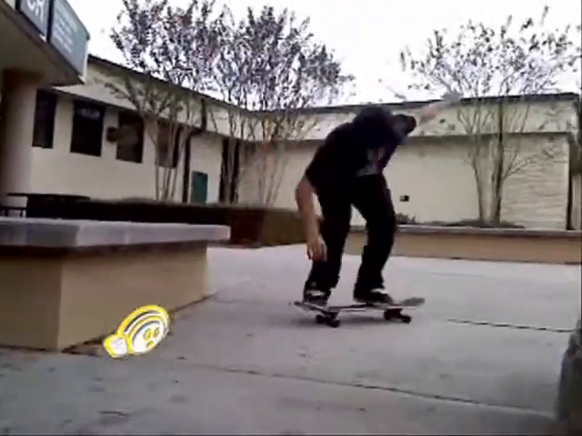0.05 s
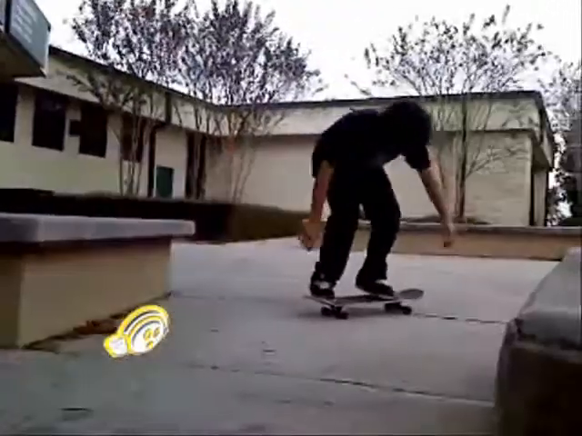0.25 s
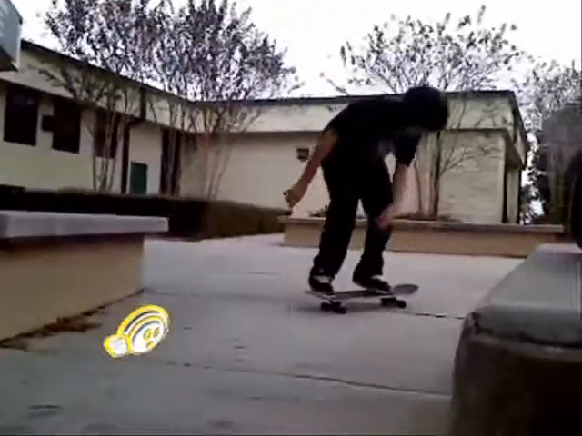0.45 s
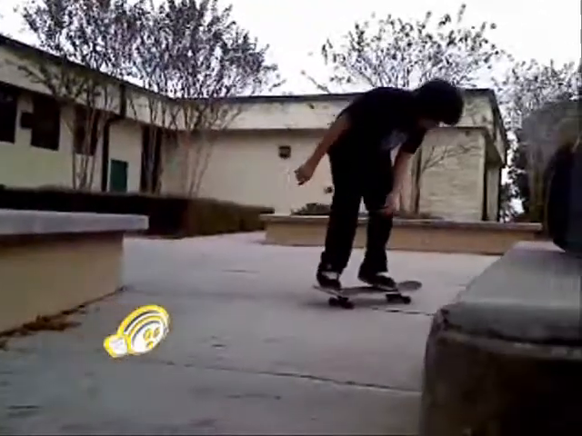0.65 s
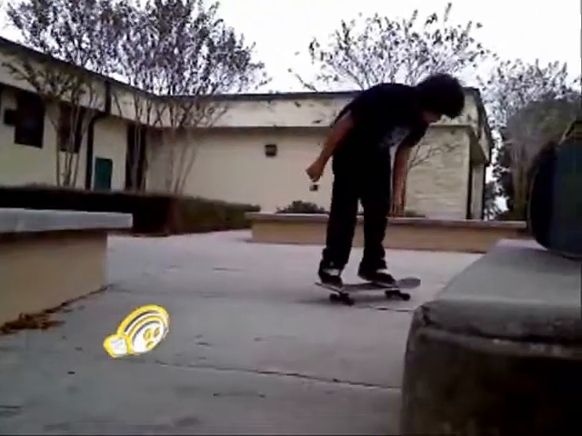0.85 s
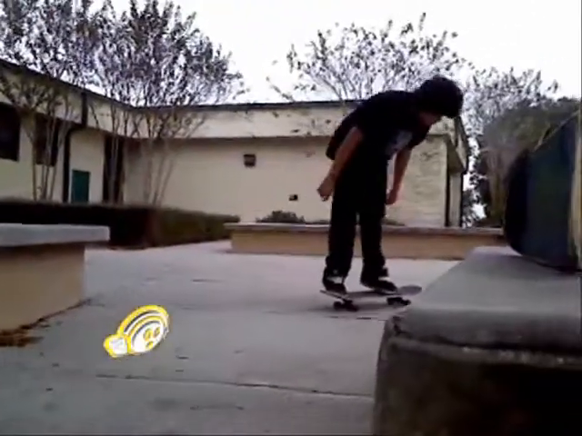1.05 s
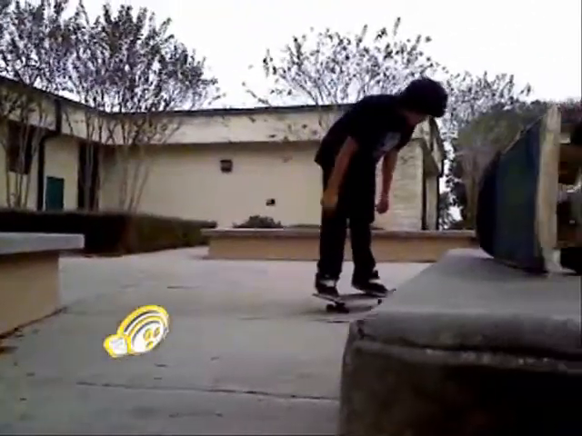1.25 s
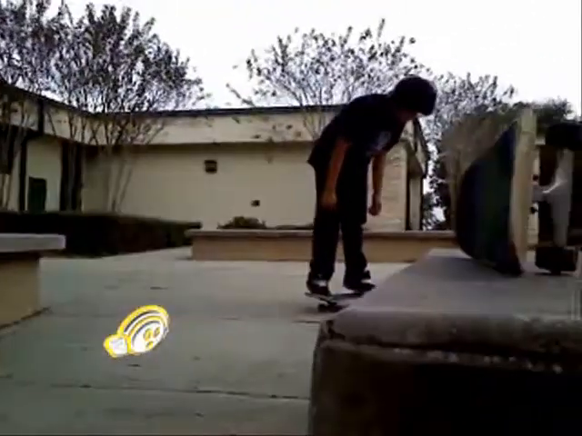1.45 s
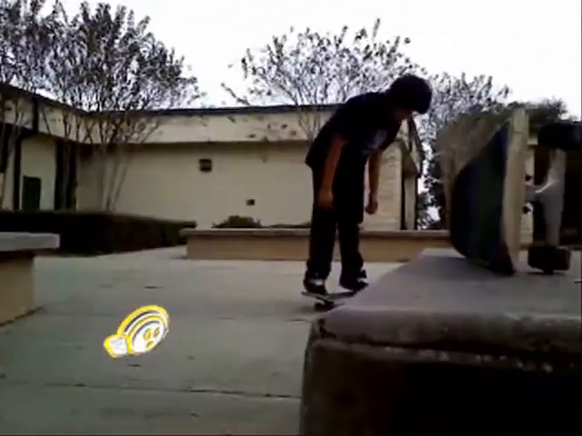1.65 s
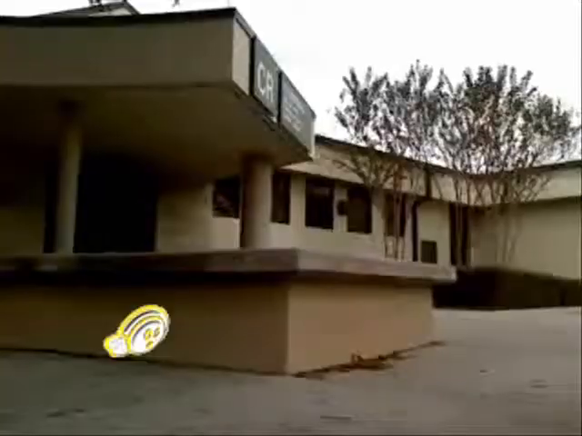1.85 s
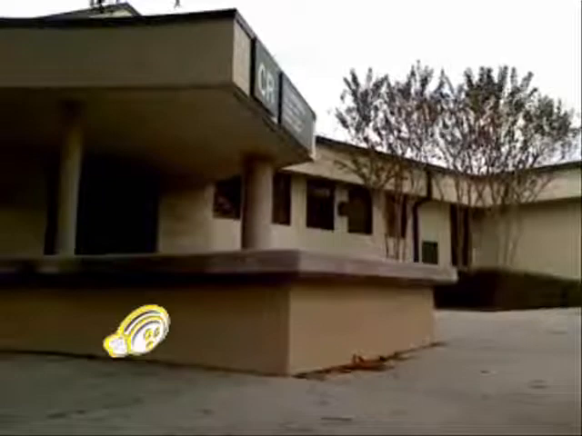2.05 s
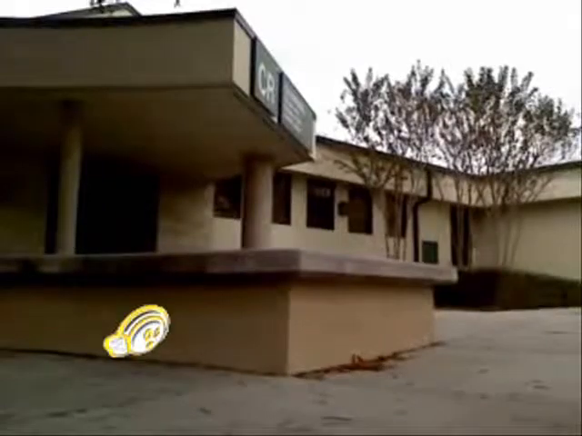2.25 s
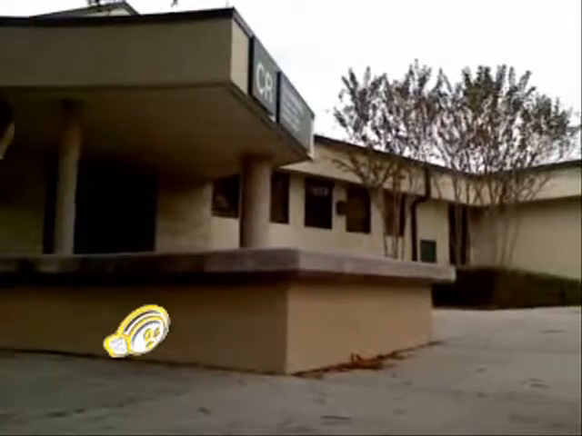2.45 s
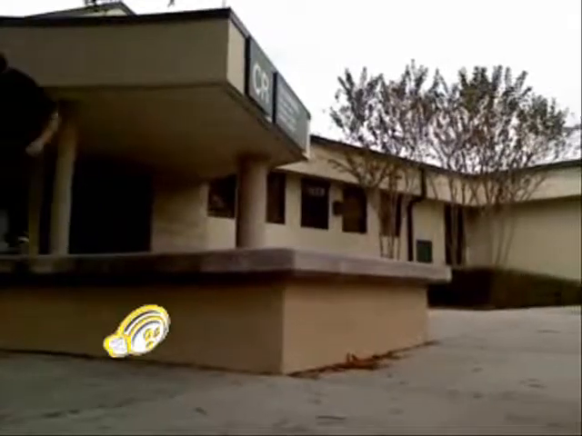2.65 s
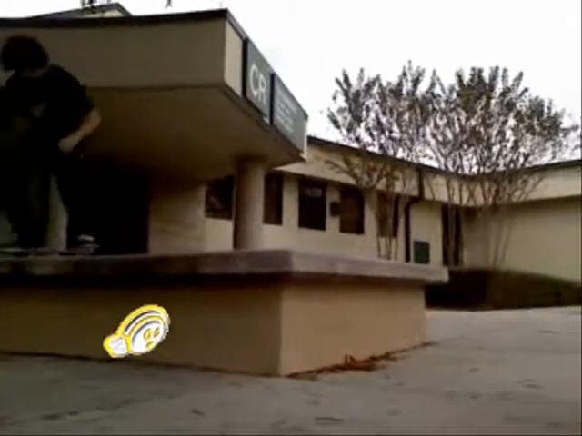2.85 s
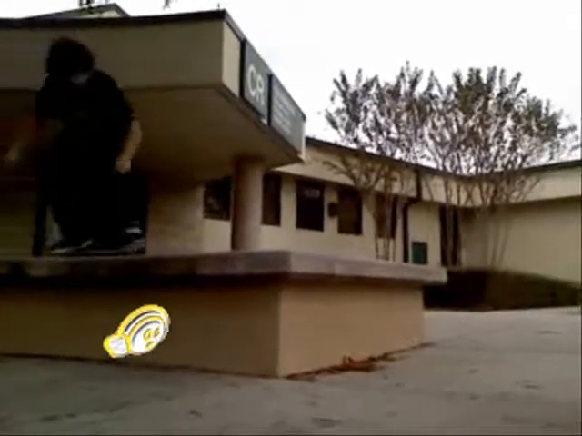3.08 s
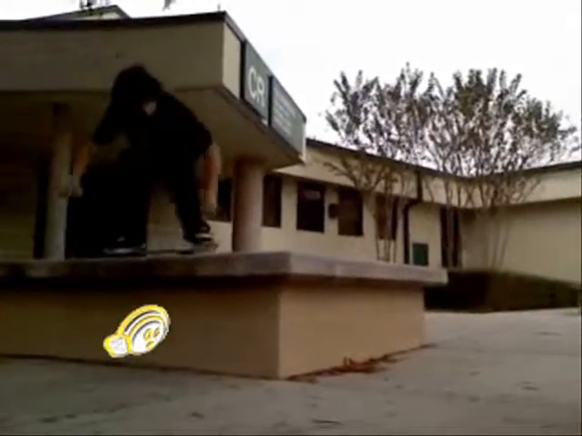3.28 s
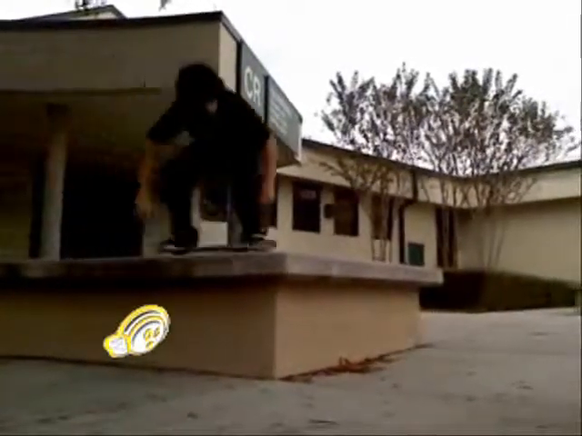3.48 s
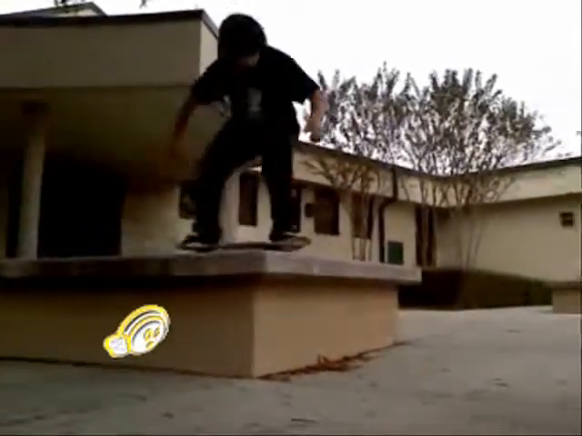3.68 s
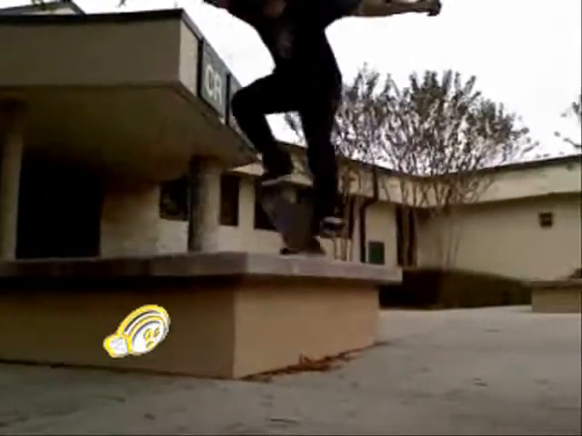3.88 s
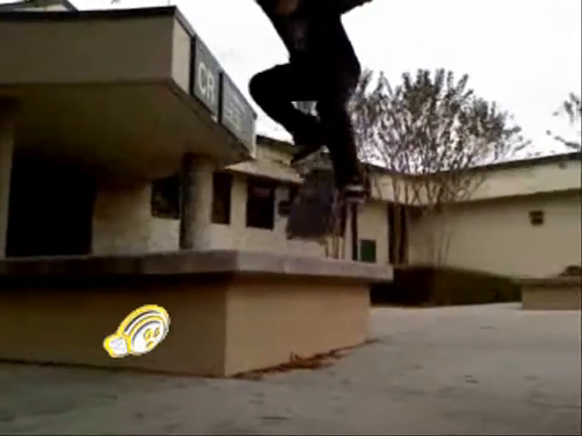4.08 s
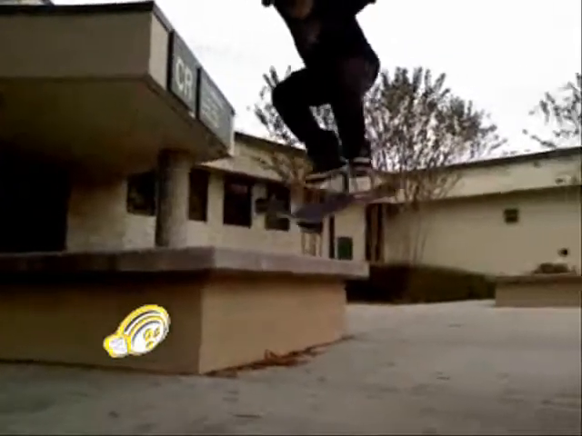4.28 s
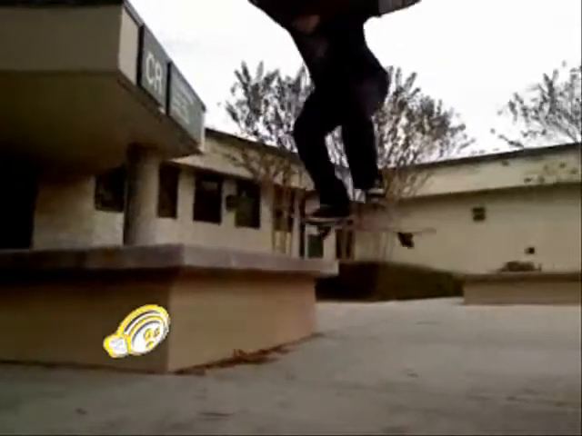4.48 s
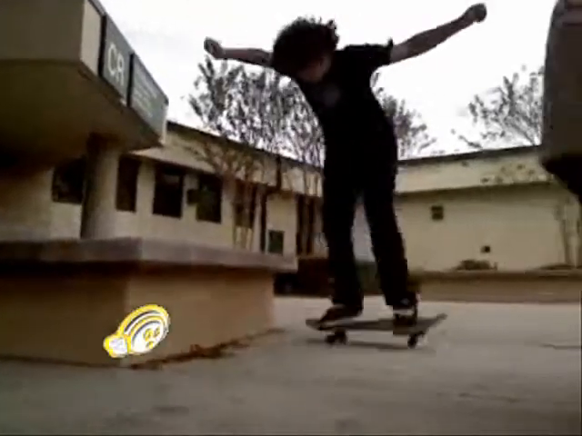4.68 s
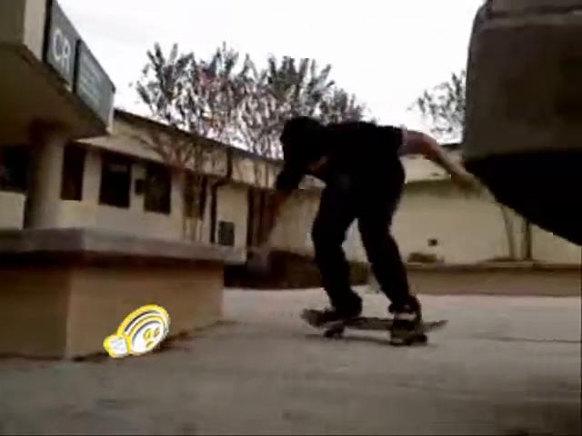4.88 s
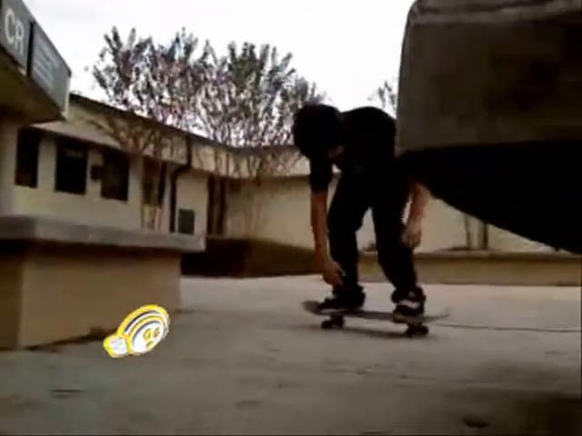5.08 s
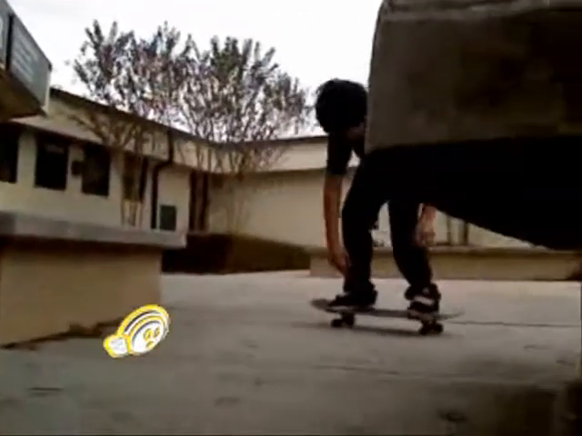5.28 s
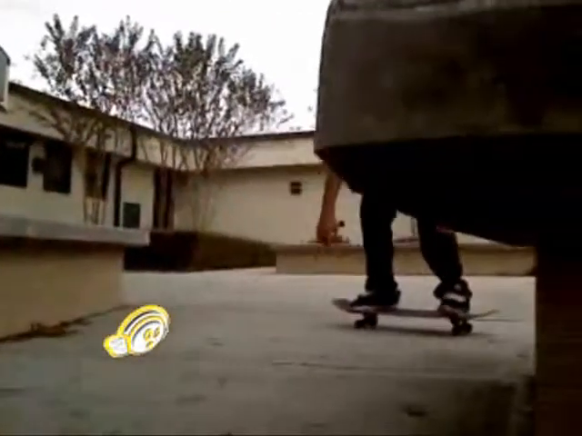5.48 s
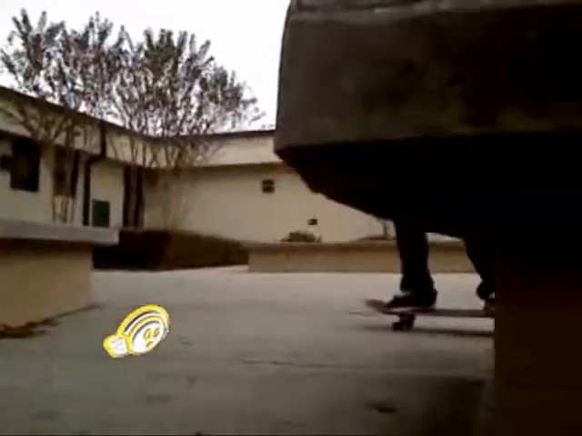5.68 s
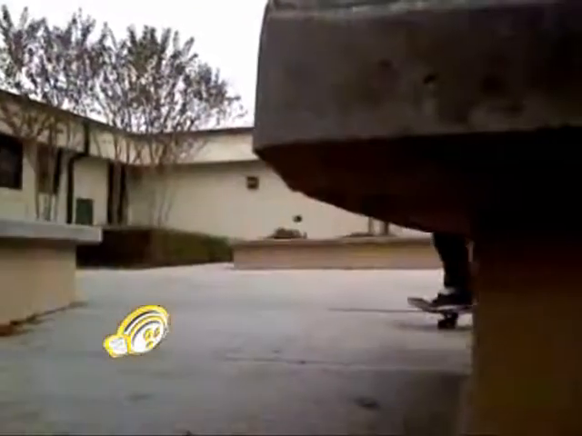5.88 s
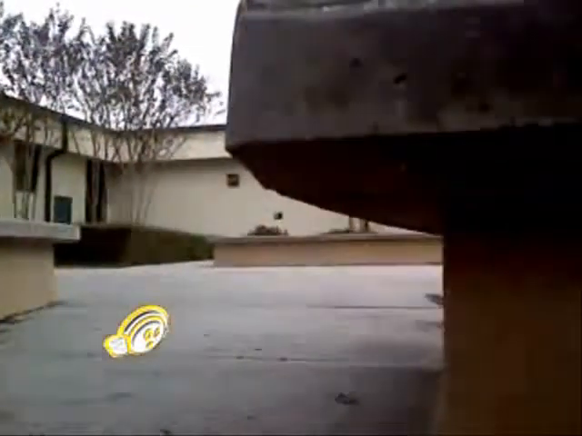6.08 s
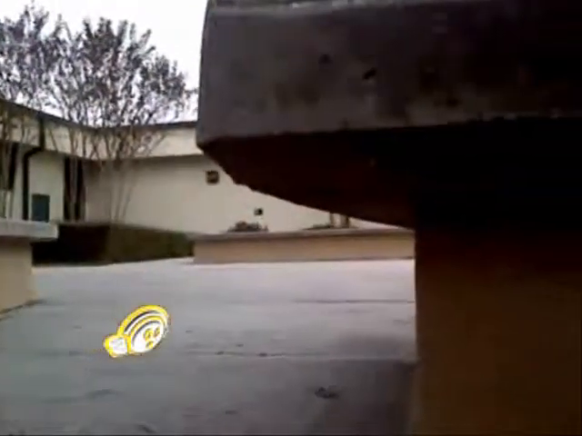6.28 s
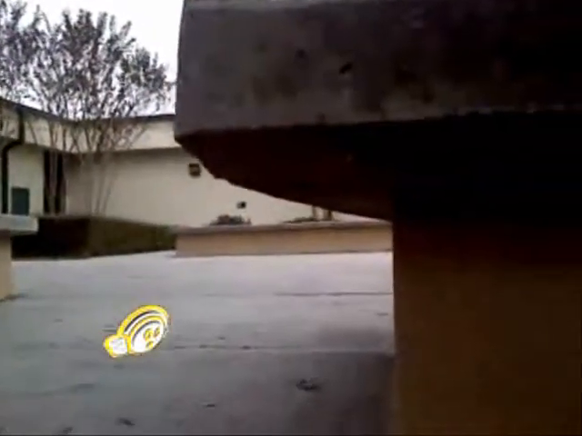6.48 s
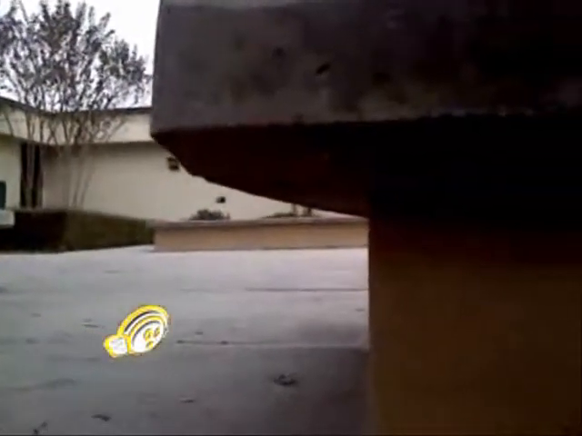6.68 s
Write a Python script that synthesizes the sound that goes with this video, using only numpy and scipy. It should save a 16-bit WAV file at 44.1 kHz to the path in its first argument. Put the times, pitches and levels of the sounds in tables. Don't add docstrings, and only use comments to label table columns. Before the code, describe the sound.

From the very start a skateboard slams onto concrete: a dense burst of wooden slaps and metal truck clanks until about 0.15 s, with short echoes off courtyard walls. Gritty wheels roll on, clacking at joints around 0.3-1.0 s and growing fainter, with a dry casing click near 1.25 and a snap at 1.55. A quick bright shoe scuff rasps at 1.9-2.05. A softer wooden landing rattles at 2.3, then wheels grind and clack from 2.7 to 3.7, with a loud close click at 3.1. From 3.9 to 4.7 sound slows to half speed; a dulled, stretched pop cracks at 4.2 and crumbles away. The hardest landing hits at 4.9, several slams with rattling hardware, settling by 5.2. Rolling recedes with small clacks at 5.7-6.0, a camera tick at 6.2 and a faint knock at 6.35. The sound is narrow, boxy and lo-fi throughout.

```python
import sys
import numpy as np
from scipy import signal
from scipy.io import wavfile
from scipy.ndimage import uniform_filter1d, map_coordinates

SR = 44100
rng = np.random.default_rng(int(sys.argv[2]) if len(sys.argv) > 2 else 0)


def materialize(psi):
    bounded = np.clip(np.atleast_2d(psi).T, -1, 1)
    quanta = np.round(bounded * 32767).astype(np.int16)
    wavfile.write(sys.argv[1], SR, quanta)


def gain_from_decibels(decibels):
    exponent = np.asarray(decibels, float) / 20
    return 10 ** exponent


N = 297234


def evened(x):
    return x / np.sqrt(np.mean(x ** 2) + 1e-20)


def read(points, hz):
    f, value = np.transpose(points)
    return np.interp(np.log(hz + 1), np.log(f + 1), value)


# (start [s], end [s])
SLOW_S = (3.898, 4.692)


def live(s):
    return s - (np.clip(s, *SLOW_S) - SLOW_S[0]) / 2


def curve(rows):
    s, *columns = np.transpose(rows)
    now_s = np.arange(N) / SR
    return np.array([np.interp(now_s, live(s), c) for c in columns])


def colour(x, points):
    hz, db = np.transpose(points)
    gains = [*gain_from_decibels(db), 0 * db[0]]
    taps = signal.firwin2(1023, [*hz, SR / 2], gains, fs=SR, window=("kaiser", 7))
    return signal.oaconvolve(x, taps, "same")


def patchy(spectrum, patchy_db):
    frames, hz = N // 256 + 5, np.fft.rfftfreq(1024, 1 / SR)
    a, b, patches = rng.standard_normal((frames, 513, 3)).T
    patches = uniform_filter1d(patches, size=6, axis=0)
    patches = evened(uniform_filter1d(patches, size=5, axis=1))
    level_db = read(spectrum, hz)[:, None] + patchy_db * np.clip(patches, -3.0, 1.6)
    z = (a + 1j * b) * gain_from_decibels(level_db)
    return evened(signal.istft(z, nperseg=1024, noverlap=768)[1][:N])


def ring(x, modes):
    out = np.zeros(x.shape)
    for k, (hz, width_hz, db) in enumerate(modes):
        r = np.exp(-np.pi * width_hz / SR)
        poles = [1, -2 * r * np.cos(2 * np.pi * hz / SR), r * r]
        out += (-1) ** k * gain_from_decibels(db) * signal.lfilter([1 - r, 0, r - 1], poles, x)
    return out


# (frequency [Hz], width [Hz], level [dB])
TRUCK_MODES = [(2080, 144, -1.75), (2254, 105, 0.4), (2484, 270, -1.7)]
AXLE_MODES = [(2740, 400, -13), (3294, 165, 0), (3410, 69, 2.5), (3706, 450, -2)]
DECK_MODES = [(59, 88, -14), (204, 65, -8), (265, 66, -3), (362, 116, -0.5), (533.4, 72, -3.5)]
PLANK_MODES = [(640, 200, -1.5), (910, 116, 1), (950, 62, 3), (1163, 105, -3)]
NOSE_MODES = [(1274, 86, -1), (1475, 144, -1.25), (1610, 79, 0.3), (1790, 153, 0.45)]


def shake_board(forces):
    board = (TRUCK_MODES, AXLE_MODES, DECK_MODES, PLANK_MODES, NOSE_MODES)
    return [ring(force, modes) for force, modes in zip(forces, board)]


# (struck [dB], rolling [dB], share of wood [dB/dB], share of steel [dB/dB])
PARTS = [
    (0, 0, 0.028, -0.067),
    (-3, 1, 0.21, 1),
    (-17, -12, 0.87, -0.24),
    (-6.5, -6, 0.71, -0.44),
    (-5.5, -1, 0.58, -0.88),
]


def parts_db(column, level_db, wood_db, steel_db):
    return np.array([level_db + p[column] + p[2] * wood_db + p[3] * steel_db for p in PARTS])


# (frequency [Hz], density [dB per Hz])
AIR = [(12, -53), (20, -9.5), (135, -16), (280, -1), (408, -23), (906, -5), (1970, -8), (2250, 3.5),
       (2810, -9.5), (3430, -4.5), (4000, -4), (5200, -55.5), (8800, -120)]


def air():
    return gain_from_decibels(-57) * patchy(AIR, patchy_db=5.0)


# (frequency [Hz], t60 [s])
YARD = [(150, 0.65), (500, 0.18), (1200, 0.28), (2500, 0.53), (4000, 0.42)]


def yard(x):
    taps = np.zeros(SR)
    at = np.arange(300, SR - 20, 20)
    taps[at + rng.integers(0, 20, len(at))] = rng.choice([-1., 1.], len(at))
    hz, t, z = signal.stft(taps, SR, nperseg=256)
    decay = gain_from_decibels(-60 * t / read(YARD, hz)[:, None])
    tail = signal.istft(z * decay, SR, nperseg=256)[1]
    return signal.fftconvolve(x, tail / np.linalg.norm(tail))[:N]


# (time [s], peak [dB], pitch [Hz], t60 [s], diaphragm push [dB])
TICKS = [
    (1.2443, -16.5, 2700, 0.01, -39),
    (1.55, -22.5, 2060, 0.0031, -5.5),
    (3.099, -11, 3140, 0.01, -17),
    (4.721, -18, 2400, 0.061, -4),
    (6.199, -34.5, 2800, .08, -34),
    (6.2115, -16, 2800, 0.0079, -39),
]


def ticks():
    out, t = np.zeros(N + 2048), np.arange(2048) / SR
    for (s, peak_db, hz, t60_s, push_db), hiss in zip(TICKS, rng.standard_normal((len(TICKS), 2048))):
        snap = hiss * gain_from_decibels(-60 * t / np.clip(t60_s, .002, .08)) * np.minimum(t / 0.0003, 1)
        for _ in range(3):
            snap = ring(snap, [(hz, 3040, 0)])
        push = t / 0.00014 * np.exp(1 - t / 0.000093)
        at = round(live(s) * SR)
        out[at:at + 2048] += gain_from_decibels(peak_db) * (snap / abs(snap).max() + gain_from_decibels(push_db) * push)
    return out[:N]


# (time [s], level [dB], resonance [Hz])
SCUFF = [
    (1.85, -72, 3260),
    (1.886, -49, 3520),
    (1.98, -33.5, 3440),
    (2.004, -54, 3120),
    (2.03, -49, 2900),
    (2.06, -60, 3010),
]


def scuff():
    level_db, hz = curve(SCUFF)
    t = np.arange(N) / SR
    wander = evened(uniform_filter1d(rng.standard_normal(N), size=300))
    slip_phase = np.cumsum(240 * (1 + .4 * wander)) / SR % 1
    grit = rng.standard_normal(N) * (1.4 + np.exp(-slip_phase / 0.34))
    turn = np.exp(2j * np.pi * np.cumsum(hz) / SR)
    r = np.exp(-np.pi * 900 / SR)
    hiss = (turn * signal.lfilter([1], np.poly([r, r]), grit / turn)).real
    return gain_from_decibels(level_db) * evened(hiss) * (t > SCUFF[0][0]) * (t < SCUFF[-1][0])


# (time [s], hum [dB], wood [dB], steel [dB])
ROLL = [(.35, -55.5, -8, -5), (.6, -51.5, -4, 0.5), (1, -63, 6.5, 1), (1.4, -57.5, -8, -0.5),
        (1.83, -68.5, 4, -4), (1.85, -72, 21, 8), (2.2, -65.5, 5.5, -1), (2.7, -52, -10.5, -1),
        (3.05, -53, 1.5, 4), (3.5, -54.5, -1.5, -2), (3.88, -63, 11, 2.5), (4.1, -60.5, 3.5, 1.5),
        (4.69, -58.5, -6.5, -7), (4.88, -47.5, -7.5, -1), (5.35, -59, 11, -0.5), (5.6, -55.5, 13.5, 0.5),
        (6.04, -53, 2, -0.5), (6.4, -67.5, 12, 0)]
# (time [s], level [dB], settling [dB per s], wood [dB], steel [dB])
SHUDDERS = [
    (.05, -31.5, 59, -1.5, 2),
    (2.36, -45, 38, 4, 2.5),
    (4.24, -46, 126, -16, -8),
    (4.92, -32.5, 58, -2, -8),
    (6.64, -51, 22, -6.5, -8.5),
]


def wheels():
    gains = gain_from_decibels(parts_db(1, *curve(ROLL)))
    for s, db, settle_db_per_s, wood_db, steel_db in SHUDDERS:
        since_s = np.maximum(np.arange(N) / SR - live(s), 0)
        rise = np.minimum(since_s / 0.0334, 1)
        shudder = rise * gain_from_decibels(parts_db(1, db - settle_db_per_s * since_s, wood_db, steel_db))
        gains = np.hypot(gains, shudder)
    bumps_per_s = 2500
    bumps = gain_from_decibels(4.2 * np.minimum(rng.exponential(1, N), 4)) * (rng.random(N) < bumps_per_s / SR)
    road = evened(bumps * rng.standard_normal(N))
    road = road + 1.22 * patchy([(20, 0), (20000, 0.0059)], patchy_db=8.5)
    return sum(g * evened(part) for g, part in zip(gains, shake_board([road] * 5)))


# (time [s], peak [dB], real pitch
# [Hz], t60 [s])
KNOCKS = [(0.049, -4.5, 1450, 0.013), (.058, -8.5, 727, 0.009), (0.094, -4, 1600, 0.015),
          (.096, -15, 730, 0.028), (.034, -18.5, 580, .04), (2.299, -21, 950, 0.087),
          (2.29, -24.5, 676, .06), (4.91, -14, 560, 0.034), (3.355, -39.5, 1410, 0.17),
          (3.589, -46.5, 2500, .12), (3.745, -44, 2430, 0.1), (3.93, -46.5, 2480, 0.13),
          (4.008, -39.5, 2700, 0.039), (4.185, -23.5, 1230, 0.015), (4.188, -34, 680, 0.0096),
          (4.185, -33.5, 345, 0.037), (2.275, -27, 1000, .05), (2.36, -37, 680, .18),
          (4.848, -36, 1290, 0.045), (4.892, -6, 920, 0.02), (4.907, -4, 970, 0.022),
          (4.9165, -4, 1150, .012), (4.917, -3.5, 1570, 0.014), (4.908, -7, 1540, 0.015),
          (4.914, -15, 265, 0.062), (6.352, -26, 1460, 0.018)]


def knocks():
    out, t = np.zeros(N + 8192), np.arange(8192) / SR
    for s, peak_db, hz, t60_s in KNOCKS:
        at = round(live(s) * SR)
        fade = gain_from_decibels(peak_db - 60 * t / t60_s) * (1 - np.exp(-t / 0.00056))
        out[at:at + 8192] += fade * np.sin(2 * np.pi * hz * t)
    return out[:N]


# (time [s], truck clank peak [dB], wood [dB], steel [dB])
FIRST_LANDING = [
    (.026, -13, 7.5, -3.5),
    (.0318, -14, 2, 4),
    (.0371, -18, 9, 0),
    (.0488, -12, -3.5, -2),
    (.0582, -12.5, 15, 1.5),
    (.0647, -12, -11.5, 3.5),
    (.0878, -22.5, -2.5, 8.5),
    (.0953, -12.5, -13, 7),
    (.1072, -22, -2, 9),
    (.1211, -14, -20, 3.5),
]
SOFT_LANDING = [(2.2725, -28, 15.5, 7.5), (2.2762, -27, 12, 9), (2.2862, -28, 11, 5), (2.294, -30, 5, 12),
                (2.3023, -27.5, 11.5, -0.5), (2.31, -26.5, 12.5, 10.5), (2.3178, -29, 9, -5),
                (2.326, -25, 6.5, 3), (2.3411, -22, -13, -5), (2.3614, -26, -2, 0.5), (2.3804, -28, -5, 0)]
HARD_LANDING = [(4.888, -12, 1, -1), (4.8916, -9.5, -8, 11), (4.9052, -10, 10.5, 6.5),
                (4.9163, -9, 7.5, -3), (4.9287, -17, -13, 12), (4.9431, -12.5, 2, 8),
                (4.955, -20.5, 4, -10.5), (4.9751, -19, 0, -10.5), (5.0179, -28, -8, -13),
                (5.0285, -22.5, 2.5, -6), (5.0451, -24, 7, 6), (5.1589, -33, -5, 5)]
SLOW_POP = [(3.935, -46, -11, 9), (4.0088, -46, -8.5, -5), (4.0214, -46, -11, -10), (4.171, -20, -6, -0.5),
            (4.1809, -18, -4.5, 2), (4.1939, -15.5, -18, -5), (4.2149, -23, -17, -12),
            (4.2449, -28, -11, -7.5), (4.268, -25.5, -24, -17), (4.2876, -30.5, -16, -4),
            (4.2999, -27.5, -14, -6), (4.3139, -25, -19.5, -16), (4.3252, -31.5, -20, -6),
            (4.347, -24, -15, -11), (4.4817, -36, -15, -8)]
JOINT_CLACKS = [(.3141, -34.5, 9, 4), (0.42, -28.5, -8, 1), (.579, -43, -12, 10), (.678, -38, -10, 8),
                (0.7777, -40, 2, -2), (.91, -38, 7, 5.5), (0.9458, -38, -1, 7.5), (1.2112, -42, -1, 1),
                (1.8919, -45, 18, 12.5), (2.712, -33, -27, 9), (2.7289, -41, -3, 16.5),
                (2.8629, -31, 7, 1.5), (2.8764, -34, 9.5, 6), (2.9247, -35.5, 3.5, 4),
                (3.292, -31.5, 4.5, 12), (3.3021, -33.5, 7, 3.5), (3.3233, -39.5, 11, -7),
                (3.363, -36, -5, 1), (3.709, -36.5, -18, 7), (4.7597, -28.5, -11, -1),
                (4.789, -32, -17, 5.5), (5.6792, -39.5, -5, 9), (5.8591, -43, -6, -3), (5.9379, -30, 0, -4),
                (5.9597, -31.5, 3, 0.5), (5.9885, -39, 20, 6.5), (6.0203, -41, 12, 1),
                (6.3506, -34.5, 13, 10.5), (6.3942, -41.5, 1, -11), (6.6505, -35.5, -3, 5)]
RATTLE_T60_S = [
    0.03,
    0.049,
    0.025,
    0.022,
    0.035,
]


def blows():
    tables = [FIRST_LANDING, SOFT_LANDING, HARD_LANDING, SLOW_POP, JOINT_CLACKS]
    rows = [(*row, t60_s) for table, t60_s in zip(tables, RATTLE_T60_S) for row in table]
    t, drive = np.arange(4096) / SR, np.zeros((5, N + 4096))
    unit = [np.abs(part).mean() for part in shake_board(rng.standard_normal((5, SR)))]
    noises = rng.standard_normal((len(rows), 6, 4096))
    for (s, peak_db, wood_db, steel_db, t60_s), (shared, *own) in zip(rows, noises):
        rise_s = 0.00079 + 0.00029 * max(-32.5 - peak_db, 0)
        fade = gain_from_decibels(-60 * t / t60_s) * np.minimum(t / rise_s, 1)
        rattle = (0.69 * shared + 0.91 * np.array(own)) * fade
        at = round(live(s) * SR)
        gains = gain_from_decibels(parts_db(0, peak_db - 5.5, wood_db, steel_db))
        drive[:, at:at + 4096] += gains[:, None] * rattle
    return sum(part / u for part, u in zip(shake_board(drive[:, :N]), unit))


def scene():
    board = blows() + knocks()
    echoes = gain_from_decibels(-7.5) * yard(board)
    return (board + echoes + wheels() + scuff() + ticks() + air())[None]


# (frequency [Hz], gain [dB])
BAND = [(0, 1), (3450, -0.5), (3700, -10.5), (3950, -21), (4080, -55), (4300, -93)]


def camera(x):
    narrow = colour(x, BAND)
    stored_hz = 48000
    t = live(np.arange(N) / SR)
    slip_s = (.5 - (t * (stored_hz - SR)) % 1) / stored_hz
    return map_coordinates(narrow, [(t + slip_s) * SR], order=3)


# (frequency [Hz], gain [dB])
TREBLE_LOSS = [(0, -0.5), (3900, -.5), (4060, -3.5), (4120, -16.5), (4280, -13), (4380, 0), (15500, 0.5),
               (15800, -68)]


def starve(x):
    hz, _, z = signal.stft(colour(x, TREBLE_LOSS), SR, nperseg=2048, noverlap=1536)
    power = uniform_filter1d(abs(z[:1020]) ** 2, size=7, axis=1)
    band_db = 10 * np.log10(power.reshape(85, 12, -1).mean(1) + 1e-16)
    masker_db = 10 * np.log10(power[93:186].sum(0) + 1e-16)
    centre_hz = hz[6:1020:12]
    margin_db = band_db - .68 * masker_db + 2.5 * np.log2(centre_hz)[:, None]
    high = centre_hz > 4100
    dropped_share = .11
    floor_db = np.quantile(margin_db[high & (centre_hz < 15000)], dropped_share)
    keep = ~high[:, None] | (margin_db > floor_db)
    bins = np.repeat(keep, 12, axis=0)[np.minimum(np.arange(1025), 1019)]
    return signal.istft(z * bins, SR, nperseg=2048, noverlap=1536)[1][:N]


def band_limit(x):
    return signal.sosfilt(signal.butter(12, 16180, fs=SR, output="sos"), x)


def record(dry):
    mix = starve(camera(dry[0]))[None]
    return band_limit(mix)


dry = scene()
out = record(dry)
materialize(out)
```